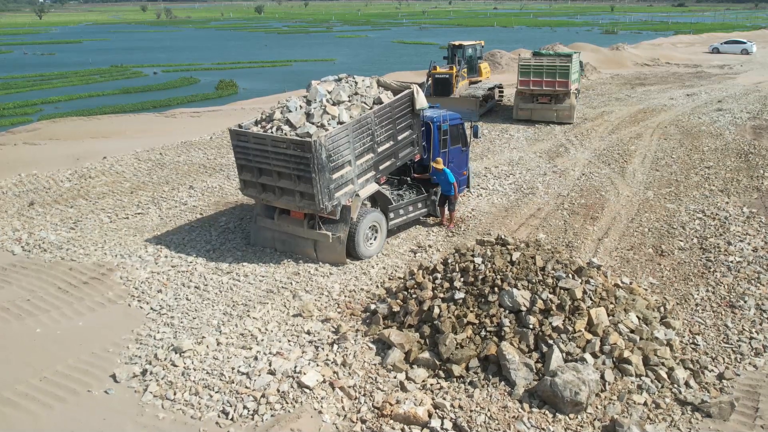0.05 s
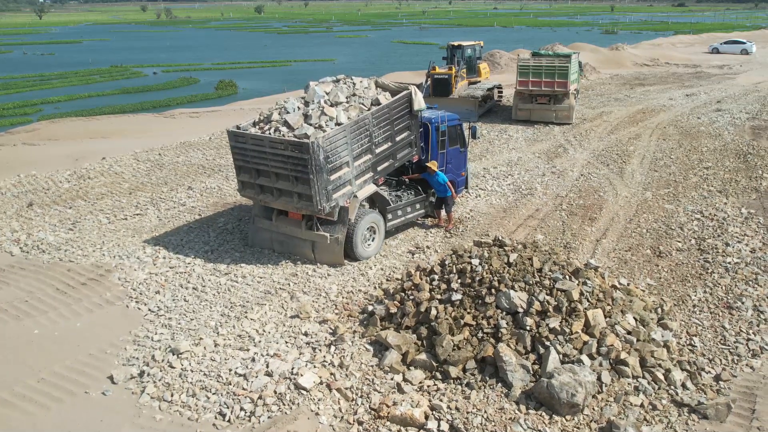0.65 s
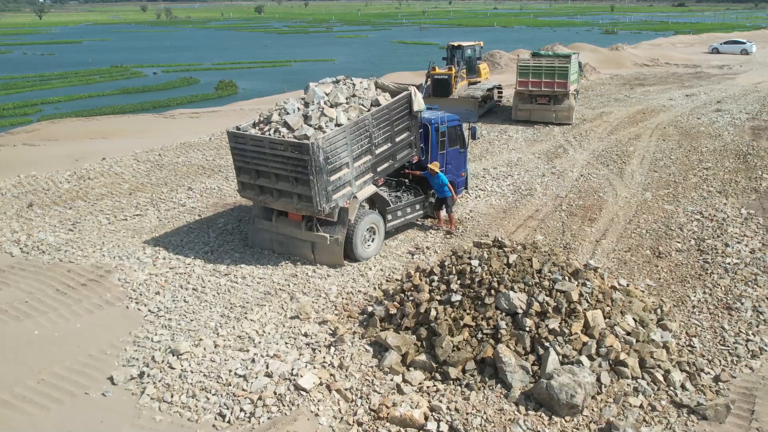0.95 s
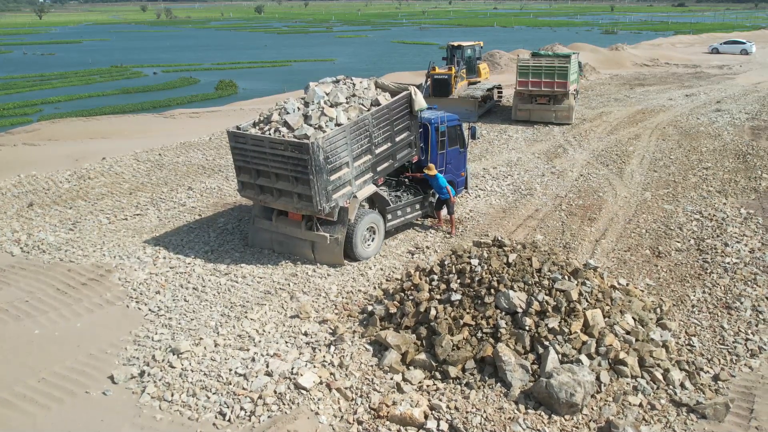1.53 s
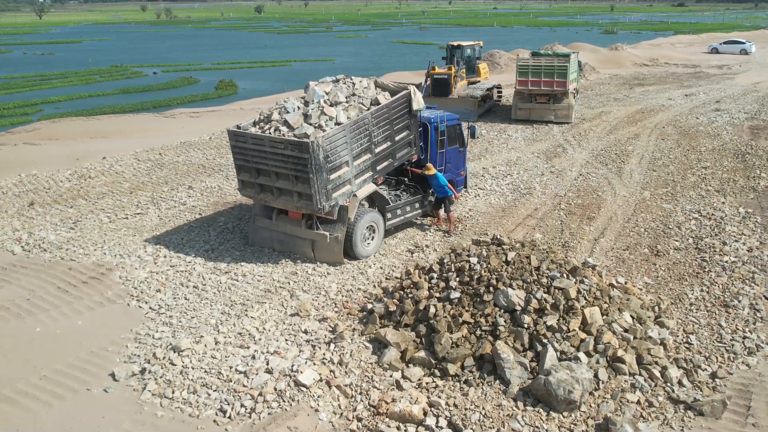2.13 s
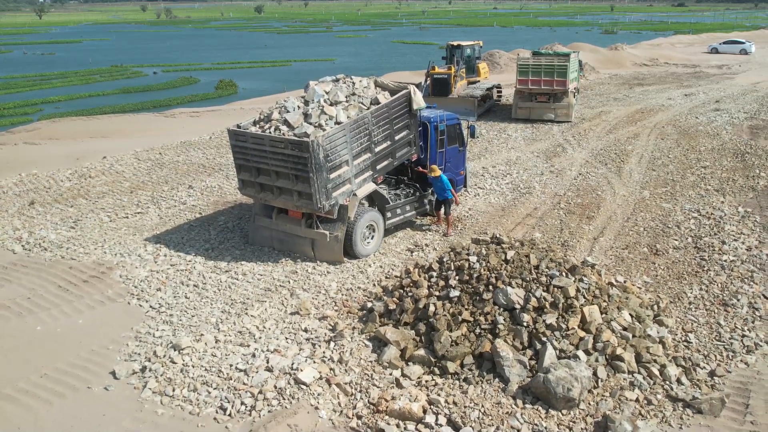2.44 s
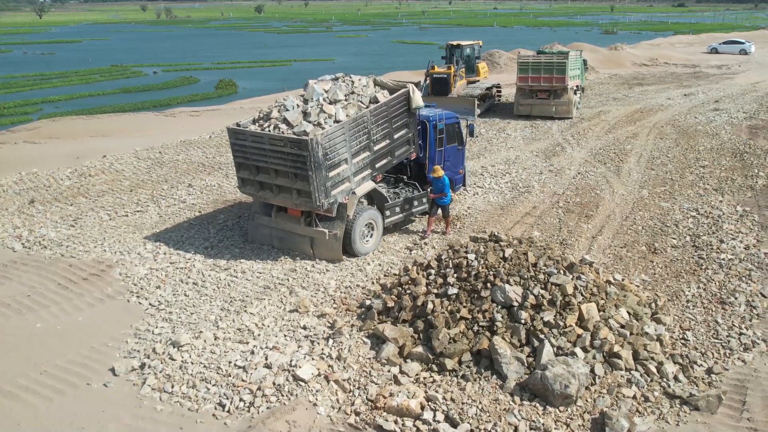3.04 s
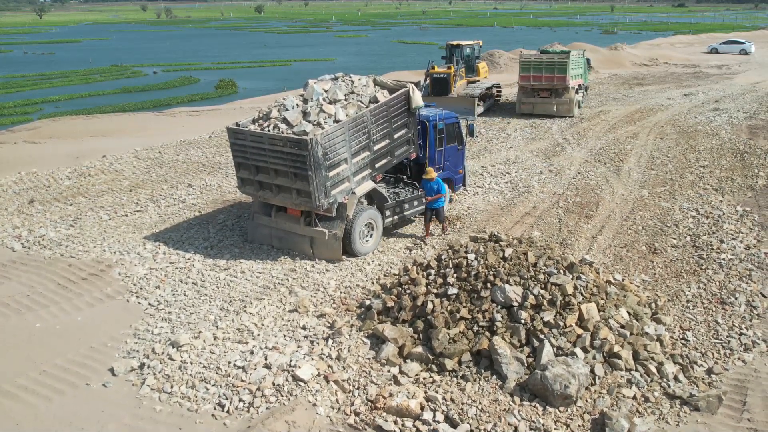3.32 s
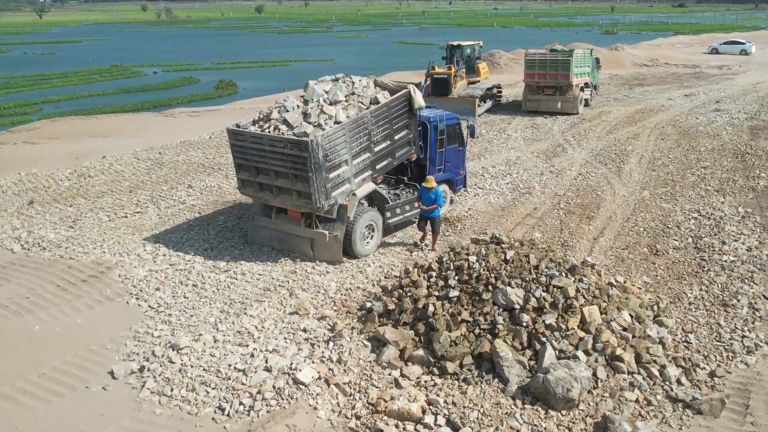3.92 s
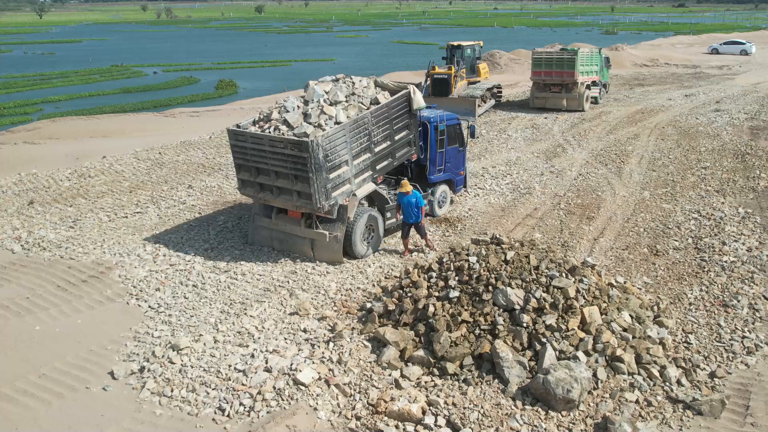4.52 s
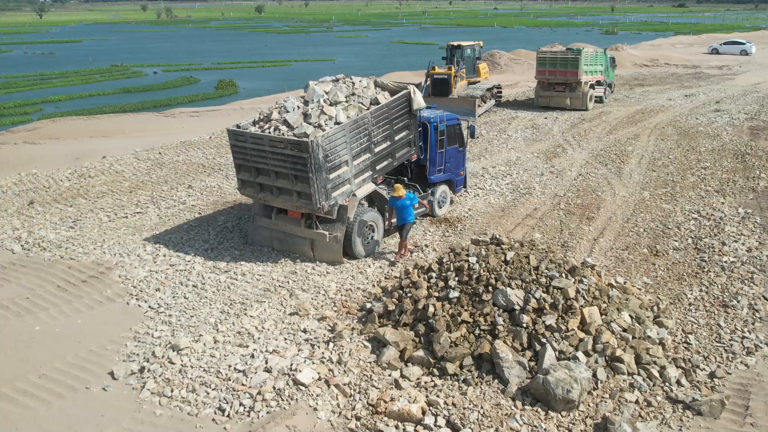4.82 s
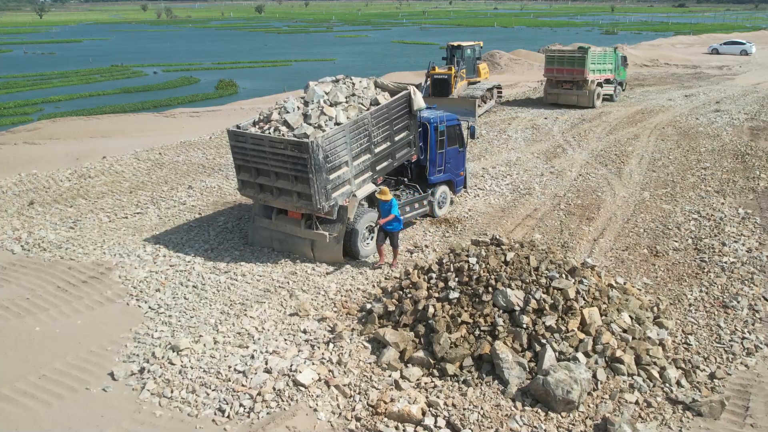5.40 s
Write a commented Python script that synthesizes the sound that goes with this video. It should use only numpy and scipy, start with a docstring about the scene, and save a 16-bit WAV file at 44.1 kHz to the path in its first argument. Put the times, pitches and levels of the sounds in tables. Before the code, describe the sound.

A bulldozer crawls over broken rock, its diesel droning and tracks rumbling, clanking and squeaking in short high notes.

```python
"""Bulldozer on broken rock

An open building site, one microphone within earshot of falling sand, no echo. A bulldozer crawls by,
its diesel droning under the rumble of the tracks. Rocks thud under the hull, track shoes clank,
pebbles clack, stone chips snap and sand slides off the steel, while the dry track pins stick and
slip, squealing in short wavering notes."""
import sys
import numpy as np
from scipy import signal
from scipy.fft import rfft, irfft, next_fast_len
from scipy.io import wavfile

SR = 44100
rng = np.random.default_rng(int(sys.argv[2]) if len(sys.argv) > 2 else 0)


def transcribe(u):
    """Save the signal u as a 16-bit wav file named by the first command-line argument.

    u: samples, shape (n,) or (channels, n), limited to [-1, 1]; the rate is SR.
    q: integer samples, one column per channel.
    """
    v = np.clip(np.atleast_2d(u).T, -1, 1)
    q = np.round(v * 32767).astype(np.int16)
    wavfile.write(sys.argv[1], SR, q)


N = 245195
T = np.arange(N) / SR

# slow drift as the machine works: (time [s], engine load [dB], rolling [dB], grinding [dB], grit [dB])
EFFORT = [(0, -29, -27, -35.5, -49), (0.3, -26.5, -24.0, -36.0, -50.0), (0.7, -24.5, -26.5, -35.5, -52.5),
          (1.05, -35, -26.5, -35.5, -50.0), (1.4, -29.5, -27.5, -35, -51), (1.9, -29, -23, -33.5, -49),
          (2.3, -30, -22.5, -32.5, -48), (2.85, -23.5, -24.5, -35.5, -51),
          (3.15, -32.5, -24.0, -35.5, -50.5), (3.6, -29.5, -22.5, -36.0, -52),
          (3.95, -32.5, -24.5, -34.5, -50.5), (4.35, -33.5, -22.5, -34, -52),
          (4.75, -35.5, -22.0, -33, -47.5), (5.0, -28.5, -25, -32.5, -50), (5.2, -37, -23.5, -31.5, -46.0),
          (5.56, -28, -21.5, -32, -46.5)]
LOAD, ROLL, GRIND, GRIT = 1, 2, 3, 4
# the hull lurching over heaps: (middle [s], length [s], heave of hull [dB], crush of rock [dB])
HULL_LURCHES = [(0.06, 0.077, 1, 5), (0.175, 0.02, -10, 7), (0.245, 0.086, 6, -2.5), (0.372, 0.16, -0.5, 4),
                (0.476, 0.12, 7, 3), (0.589, 0.072, 9, 6), (0.793, .04, -11, 8.5), (0.915, 0.091, 5, -2.5),
                (1.166, 0.087, -1, 4), (1.496, 0.02, 9, 9.5), (1.617, 0.037, 1, 1), (1.732, 0.08, -3, 4.5),
                (1.95, 0.055, -1, -1.5), (2.055, 0.037, 8, 0.5), (2.31, 0.088, -1.5, -4),
                (2.376, 0.24, 8, 3), (2.769, 0.043, 5, 1), (2.946, 0.14, 6.5, 5.5), (3.237, 0.18, 5, 3),
                (3.358, .06, 7, 4.5), (3.578, 0.057, 4, 1.5), (3.665, 0.06, 5, -1), (4.245, .11, 0.5, 6),
                (4.371, 0.036, 5.5, 5.5), (4.492, 0.096, 8.5, -1), (4.647, 0.089, 8, 3.5),
                (4.828, 0.1, 7, 2), (5.181, 0.1, 6, 3.5), (5.323, 0.1, 6.5, 5)]
HEAVE, CRUSH = 2, 3
# sand sliding off the steel: (time [s], length [s], level [dB])
SAND_SPILLS = [(.015, .04, -49), (0.645, 0.033, -57.5), (1.46, 0.08, -71), (1.718, 0.036, -61),
               (1.915, .02, -52), (1.975, .03, -61), (2.044, 0.014, -50.5), (2.66, 0.061, -57),
               (3.16, 0.043, -52), (3.275, 0.04, -48), (3.4, 0.07, -59), (4.436, 0.034, -53),
               (4.672, 0.012, -46), (4.85, 0.017, -46.5), (5.373, 0.022, -47)]
# stone chips breaking: (time [s], peak [dB], brightness [dB])
CHIP_SNAPS = [(0.2662, -20, -22), (0.3325, -17.5, -21), (0.4, -19.5, -17), (0.4737, -29, -29),
              (0.523, -30, -10.5), (0.665, -21, -13), (0.823, -17.5, -21), (0.8769, -21, -22),
              (.9473, -30, -12), (1.048, -28, -20), (1.1762, -31, -11), (1.2172, -31, -10),
              (1.509, -22.5, -25), (1.8437, -21, -31), (1.953, -24.5, -20), (3.0614, -27.5, -14),
              (3.349, -26.5, -10), (3.4681, -35, -21), (3.9882, -25, -41), (4.1376, -33, -9),
              (4.2633, -31, -11), (4.433, -26, -15), (4.626, -29, -20), (4.6684, -38, -9),
              (4.7143, -24.5, -18), (4.8378, -20.5, -27), (5.062, -26, -18), (5.105, -21, -22),
              (5.138, -20.5, -24), (5.1724, -24, -24), (5.249, -23.5, -9), (5.3703, -28, -5),
              (5.4094, -15.5, -15), (5.482, -23, -13)]
# rocks knocking under the hull: (time [s], level [dB], pitch [Hz])
ROCK_THUDS = [(0.08, -0.5, 165), (0.466, -9.5, 125), (0.586, -3.5, 127), (1.164, -4, 131),
              (1.744, -1.5, 123), (2.38, -6, 118), (2.931, -4, 102), (2.953, -9, 140), (2.978, -1, 108),
              (3.016, 1.5, 143), (3.228, -5, 116), (3.364, -1.5, 102), (3.583, 1.5, 116),
              (4.091, -2.5, 213), (4.374, -1.5, 129), (4.617, -14, 126), (5.303, -2, 221)]
# track shoes striking rock: (time [s], peak [dB], brightness [dB])
SHOE_STRIKES = [(0.012, -16, -6.5), (.094, -18.5, -6), (.321, -17, -21.5), (.773, -12.5, -9.5),
                (.949, -19, -11), (1.216, -13.5, -15), (1.481, -16, -15), (1.734, -19, -13.5),
                (1.955, -12, -32), (2.195, -13, -21), (2.401, -18, -26), (2.442, -20, -9),
                (2.635, -17.5, -29), (2.681, -13.5, -7), (2.928, -19.5, -12.5), (3.163, -17, -18),
                (3.252, -32, -29), (3.411, -19.5, 10), (3.642, -18.5, -10.5), (3.904, -18.5, -8),
                (3.986, -17, -13), (4.091, -17.5, -26), (4.226, -22, -28), (4.305, -16.5, -18),
                (4.378, -15.5, -16), (4.62, -10.5, -32), (4.654, -11, -43), (4.703, -14.5, -10),
                (4.848, -14, -11), (5.085, -12, -15), (5.371, -16, -36.5)]
# modes of a track shoe with its frame: (frequency [Hz], level [dB], time to fall 60 dB [s])
SHOE_MODES = [(278, -5, 0.042), (456, 6, 0.15), (614, -2, 0.043), (768, -8, 0.21), (890, -10.5, 0.065),
              (960, -8.5, 0.059), (1178, -19, 0.067), (1320, -11.5, 0.032), (1760, 6.5, 0.014),
              (2012, 2, 0.031), (2465, -14.5, 0.022), (3040, -8, 0.064), (3720, -5, 0.026)]
# diesel exhaust, from the firing rate up through its multiples: (level [dB])
EXHAUST_HARMONICS = [2, -14.5, -20.5, -12.5]
# pin slips: (start [s], length [s], pitch [Hz], glide [Hz], level [dB], crest [share of length])
PIN_SLIPS = [(0, 0.043, 6800, -36, -42, 0.12), (0.042, 0.055, 3520, 14, -26.5, 0.55),
             (0.214, 0.055, 3720, 61.5, -25, 0.4), (0.556, 0.064, 3790, -54, -25.5, 0.84),
             (0.621, 0.04, 6885, 63, -49, 0.6), (0.734, 0.018, 14220, -120, -37, 0.3),
             (0.957, 0.064, 3890, -150, -25, 0.45), (0.998, 0.082, 3870, 50, -26.5, 0.11),
             (1.06, 0.051, 3516, -100, -22.5, 0.64), (1.11, 0.024, 3330, 100, -32, 0.25),
             (1.127, 0.051, 3620, 40, -27.5, 0.86), (1.182, 0.084, 3490, 60, -32.5, 0.4),
             (1.246, 0.05, 3650, -120, -27, 0.6), (1.261, 0.041, 3416, -10, -28, 0.45),
             (1.41, 0.094, 3550, 103, -27, 0.66), (1.508, 0.12, 3454, -75, -29, 0.15),
             (1.612, 0.043, 3440, -50, -31.5, 0.43), (1.689, 0.1, 3430, -50, -28, 0.58),
             (1.788, 0.1, 3534, 28, -30, 0.2), (2.043, 0.03, 3420, 155, -29.5, 0.41),
             (2.3, 0.083, 3416, 75.5, -31.5, 0.18), (2.418, 0.066, 3540, -100, -26.5, 0.62),
             (2.468, 0.1, 3580, 74, -21, 0.42), (2.578, 0.05, 3610, 148, -36, 0.15),
             (2.627, 0.063, 3670, -130, -29, 0.98), (2.938, 0.097, 3260, 191, -36, 0.71),
             (3.136, 0.052, 3505, -93, -34, 0.82), (3.233, 0.12, 3420, 67.5, -38, 0.35),
             (3.363, 0.072, 3715, 122, -32.0, 0.39), (3.399, 0.088, 4040, -17, -29, 0.54),
             (3.421, 0.061, 3580, -120, -28, 0.74), (3.463, 0.083, 3535, -3, -28, 0.73),
             (3.532, 0.078, 3710, 133, -35, 0.16), (3.643, 0.115, 3590, 275, -25.5, 0.47),
             (3.9, 0.046, 3565, -110, -26, 0.64), (3.995, 0.085, 3595, 104, -32.5, 0.2),
             (4.183, 0.058, 3714, 30, -29.5, 0.66), (4.371, 0.11, 3720, -200, -31, 0.15),
             (4.433, 0.1, 3760, 432, -31, 0.53), (4.63, 0.045, 3620, -74, -30, 0.32),
             (5.134, 0.069, 3954, 17, -26.5, 1), (5.189, 0.067, 3930, -56.5, -27, 0.76),
             (5.287, 0.061, 3250, -30, -27.5, 0.56), (5.508, 0.055, 3485, 23, -32, 0.85)]
# how hard the pins bite, which lifts their overtones: (time [s], level [dB])
PIN_BITE = [(0, 2.5), (.6, -11), (1.05, -13), (1.25, 2), (1.55, -5), (1.75, 5.5), (1.9, 9), (2.1, -6),
            (3.3, -6), (3.7, -3.5), (4.4, -5), (5.5, 2)]
# spectra at the microphone, each: (frequency [Hz], level [dB])
SAND_SPECTRUM = [(4000, -41), (8500, -15.5), (10500, -10), (12500, 1.5), (14500, 1), (16500, -30)]  # fine grains on steel
CHIP_SPECTRUM = [(800, 3.5), (2800, -4), (4400, 2.5), (5600, -3.5), (7000, -22.5), (8800, -28.5),
                 (11000, -16.5), (13500, -9), (16000, -20)]  # splitting stone
BOOM_SPECTRUM = [(18, -44), (30, -13), (40, -14), (50, 3), (66, -0.5), (82, 5.5), (110, -24.5), (200, -42)]  # hull shaken by the engine
RUMBLE_SPECTRUM = [(45, -41), (70, -17.5), (92, -6), (128, -2), (175, -12), (260, -16), (500, -46)]  # hull shaken by the tracks
ROCK_SPECTRUM = [(70, -43), (150, -2.5), (210, 1), (290, 1), (420, -4), (560, -18.5), (800, -38.5),
                 (1600, -36)]  # rolling rocks
GRAVEL_SPECTRUM = [(300, -50), (560, -13), (770, 0.5), (980, -6), (1180, -1), (1550, -9.5), (2450, -10.5),
                   (3000, -16.5), (4200, -21), (7000, -48)]  # grinding gravel
GRIT_SPECTRUM = [(1500, -25), (3000, -4.5), (4200, 1), (5000, 1), (5800, -6.5), (6700, -18), (7800, -29.5),
                 (9200, -28.5), (11000, -22.5), (13500, -18), (15000, -26), (16500, -28)]  # hissing grit
PIN_SPECTRUM = [(2000, -7), (4500, 3), (6900, -2.5), (7400, -15), (8300, -7), (10400, -6.5), (11500, 2),
                (14000, -8), (16000, -22)]  # how the squeal's overtones carry


def amp(db):
    """Decibels to gain."""
    return 10 ** (np.asarray(db) / 20)


def unit(x):
    """Scales to an rms of 1."""
    return x / np.sqrt(np.mean(x ** 2) + 1e-20)


def add(mix, start_s, sound):
    """Mixes a sound in at its start time."""
    part = mix[max(0, round(start_s * SR)):][:len(sound)]
    part += sound[:len(part)]


def colour(x, spectrum):
    """Filters x by (frequency [Hz], level [dB]) points on a log axis, rolling off past both ends."""
    hz, db = np.transpose(spectrum)
    size = next_fast_len(len(x))
    f = np.fft.rfftfreq(size, 1 / SR) + 1
    skirts = np.minimum(f / hz[0], 1) ** 2 * np.minimum(hz[-1] / f, 1) ** 4
    gain = amp(np.interp(np.log(f), np.log(hz), db)) * skirts
    return irfft(rfft(x, size) * gain, size)[:len(x)]


def wander(rate_hz):
    """Random motion of rms 1, mostly slower than rate_hz."""
    slow_sr, size = 2000, 16384
    f = np.fft.rfftfreq(size, 1 / slow_sr)
    motion = irfft(rfft(rng.standard_normal(size)) / (1 + (f / rate_hz) ** 4))
    return unit(np.interp(T, np.arange(size) / slow_sr, motion))


def impacts(per_s, spread_db, wash):
    """Small collisions of uneven size, over a wash of those too fine to tell apart."""
    size = amp(spread_db * np.minimum(rng.exponential(1, N), 3))
    hits = size * rng.choice([-1, 1], N) * (rng.random(N) < per_s / SR)
    return unit(unit(hits) + wash * rng.standard_normal(N))


def gain_curve(column, table=EFFORT):
    """One column of levels over time, as a gain for every sample."""
    rows = np.array(table)
    return amp(np.interp(T, rows[:, 0], rows[:, column]))


def lurch_db(column, settle_share=0.25, settle_lag=0.81):
    """Each lurch swells and fades, and a lull follows while the hull settles."""
    db = np.zeros(N)
    for row in HULL_LURCHES:
        u = (T - row[0]) / row[1]  # time in lurch lengths
        lull = settle_share * np.exp(-(2 * (u - settle_lag)) ** 2)
        db += row[column] * (np.exp(-(2 * u) ** 2) - lull)
    return db


def sand(trickle_db=-67, patchy_db=3, ticks_db=-67, tick_s=0.001):
    """Fine grains trickle over the steel and now and then spill in a rush; coarser ones tick singly."""
    flow = amp(trickle_db + patchy_db * wander(12)) * unit(gain_curve(GRIT))
    for s, length, db in SAND_SPILLS:
        flow += amp(db) * np.exp(-(2 * (T - s) / length) ** 2)
    t = np.arange(900) / SR
    skid = rng.standard_normal(len(t)) * (np.exp(-t / tick_s) + 0.15 * np.exp(-t / 0.0087))
    ticks = signal.fftconvolve(impacts(per_s=14, spread_db=1.7, wash=0), skid)[:N] * gain_curve(GRIT)
    ticks = colour(ticks, [(2500, -8), (4800, 3), (7500, -16), (9000, -22.5),
                           (12500, -2), (15000, -3), (16500, -16)])
    grains = unit(colour(impacts(1500, 3.1, 0.9), SAND_SPECTRUM))
    return flow * grains + amp(ticks_db) * unit(ticks)


def pebbles(level_db=-11, per_s=5, spread_db=3, ring_s=0.0058):
    """Loose pebbles clack together all the time, each size at its own pitch."""
    out, t = np.zeros(N), np.arange(1500) / SR
    envelope = (1 - np.exp(-t / 0.0028)) * np.exp(-t / ring_s)
    for hz in np.geomspace(800, 2700, 14):
        clack = envelope * (np.sin(2 * np.pi * hz * t) + 0.5 * np.sin(2 * np.pi * hz * 1.6 * t))
        out += signal.oaconvolve(impacts(per_s, spread_db, wash=0), clack)[:N] / np.sqrt(hz)
    return amp(level_db) * unit(out) * gain_curve(GRIND)


def chip_snaps(level_db=3, crack_s=0.002, split=4, tilt=0.67):
    """A chip of stone splits with one sharp click and a brief spray of splinters."""
    out, t = np.zeros(N), np.arange(-256, 1024) / SR
    for s, db, bright_db in CHIP_SNAPS:
        splinters = rng.standard_normal(len(t)) * (t >= 0) * np.exp(-abs(t) / crack_s)
        crack = colour(splinters + split * (t == 0), CHIP_SPECTRUM)
        treble_db = tilt * (bright_db + 17.5)  # a cleaner break is brighter
        crack = colour(crack, [(200, 0), (7000, 0), (11000, treble_db), (17000, treble_db)])
        add(out, s + t[0], amp(db + level_db) * crack / abs(crack).max())
    return out


def diesel(firing_hz=64.75, waver=0.00636, note_db=-2.5, boom_db=-1.5, throb_db=6, sway_db=1.9):
    """The firing note of the diesel hunts a little; the hull booms with it as the load swells."""
    firings = np.cumsum(firing_hz * (1 + waver * wander(7.9))) / SR
    note = np.zeros(N)
    for order, db in enumerate(EXHAUST_HARMONICS, 1):
        throb = amp(db + throb_db * wander(19))
        note += throb * np.sin(2 * np.pi * (order * firings + rng.random()))
    boom = unit(colour(impacts(200, 1.7, 1.2), BOOM_SPECTRUM))
    swell = gain_curve(LOAD) * amp(0.53 * lurch_db(HEAVE) + sway_db * wander(13))
    return (amp(note_db) * unit(note) + amp(boom_db) * boom) * swell


def rock_thuds(level_db=-3.5, rise_s=0.00027, ring_s=0.0051):
    """A heavy rock under the hull gives one dull push that dies within a cycle or two."""
    out, t = np.zeros(N), np.arange(3000) / SR
    for s, db, hz in ROCK_THUDS:
        push = (1 - np.exp(-t / rise_s)) * np.exp(-t / ring_s) * np.sin(2 * np.pi * hz * t)
        add(out, s, amp(db + level_db) * push / abs(push).max())
    return colour(out, [(50, 2.5), (100, -4.5), (400, -1), (1500, -12), (4000, -12)])


def shoe_clanks(level_db=-2, crumble_gain=0.57, crumble_s=0.012, scatter=0.024, rise_s=0.00066):
    """A track shoe rings briefly, damped by the ground, while the stone under it crumbles."""
    out, t = np.zeros(N), np.arange(5000) / SR
    hz, mode_db, t60 = np.array(SHOE_MODES).T[:, :, None]
    for s, db, bright_db in SHOE_STRIKES:
        detune, drive = rng.standard_normal((2, len(SHOE_MODES), 1))
        decays = amp(mode_db + 2.6 * drive - 60 * t / t60) * np.sign(drive)
        modes = decays * np.sin(2 * np.pi * hz * (1 + scatter * detune) * t)
        crumble = colour(rng.standard_normal(len(t)), GRAVEL_SPECTRUM) * np.exp(-t / crumble_s)
        hit = (unit(modes.sum(0)) + crumble_gain * unit(crumble)) * (1 - np.exp(-t / rise_s))
        treble_db = bright_db + 7.5  # each clank has its own brightness, from dull knock to bright clink
        hit = colour(hit, [(100, 0.0038), (1000, 0), (2200, treble_db), (5000, treble_db)])
        add(out, s, amp(db + level_db) * hit / abs(hit).max())
    return out


def tracks(rumble_db=-15, rolling_db=-1, edge_gain=0.3, grinding_db=-2.4, grit_db=3):
    """Tracks on rubble: the hull rumbles; rocks roll, gravel grinds and grit hisses, jolted together."""
    jolt_db, crush_db = wander(28), lurch_db(CRUSH)
    weight = gain_curve(ROLL) * amp(crush_db)
    rumble = unit(colour(impacts(260, 2.0, 0.8), RUMBLE_SPECTRUM))
    rumble *= gain_curve(LOAD) ** 0.36 * amp(rumble_db + lurch_db(HEAVE))
    rocks = impacts(330, 3.26, 0.92) * amp(jolt_db)
    rolling = unit(colour(rocks, ROCK_SPECTRUM)) * weight * amp(rolling_db)
    # pressed harder, the rocks knock with a brighter edge
    edge = unit(colour(rocks, [(250, -29), (480, 5), (620, 3), (900, -5.5), (1600, -47)]))
    edge *= edge_gain * weight ** 2 / weight.max()
    grinding = unit(colour(impacts(700, 2.3, 2.4), GRAVEL_SPECTRUM) * amp(0.84 * jolt_db))
    grinding *= gain_curve(GRIND) * amp(grinding_db + 0.052 * crush_db)
    grit = unit(colour(impacts(600, 6.1, 2.5), GRIT_SPECTRUM) * amp(1.9 * jolt_db))
    grit *= gain_curve(GRIT) * amp(grit_db)
    return rumble + rolling + edge + grinding + grit


def pin_squeals(level_db=-2.5, catch_db=-11, release_db=-12, flutter_db=2.5, fade_s=0.0053,
                overtones_db=(-23, -28, -30), ring_gain=0.4, ring_s=0.012):
    """A dry pin sticks and slips: a nearly pure note swells, glides, lets go and rings in the steel."""
    notes, overtones = np.zeros((2, N))
    bend = 1 + 0.0018 * wander(34) + 0.0037 * wander(45) + 0.0042 * wander(350)  # drift, waver, rasp
    grip = amp(flutter_db * wander(81))
    for s, length, hz, glide_hz, db, crest in PIN_SLIPS:
        slipping = (T >= s) & (T <= s + length)
        progress = (T[slipping] - s) / length
        pitch_hz = (hz + glide_hz * (progress - 0.5)) * bend[slipping]
        phase = 2 * np.pi * np.cumsum(pitch_hz) / SR
        swell_db = np.interp(progress, [0, crest, 1], [catch_db, 0, release_db])
        fade = np.clip(np.minimum(progress, 1 - progress) * length / fade_s, 0, 1)
        level = np.sqrt(2) * amp(level_db + db + swell_db) * unit(grip[slipping]) * fade
        add(notes, s, level * np.sin(phase))
        for order, overtone_db in enumerate(overtones_db, 2):
            if order * hz < SR / 2:
                add(overtones, s, level * amp(overtone_db) * np.sin(order * phase))
    notes += colour(overtones, PIN_SPECTRUM) * gain_curve(1, PIN_BITE)
    t = np.arange(4000) / SR
    steel_ring = rng.standard_normal(len(t)) * np.exp(-t / ring_s)
    return notes + ring_gain * signal.fftconvolve(notes, steel_ring / np.linalg.norm(steel_ring))[:N]


def scene():
    """Open ground: every sound reaches the one microphone directly."""
    machine = diesel() + tracks() + rock_thuds() + shoe_clanks()
    debris = pebbles() + chip_snaps() + sand()
    return (machine + debris + pin_squeals())[None]


def record(dry, edge_hz=16200):
    """The recorder behind the microphone cuts off the highest treble."""
    lowpass = signal.firwin(511, edge_hz, window=("kaiser", 9), fs=SR)
    return signal.oaconvolve(dry, lowpass[None], "same")


dry = scene()
out = record(dry)
transcribe(out)
```